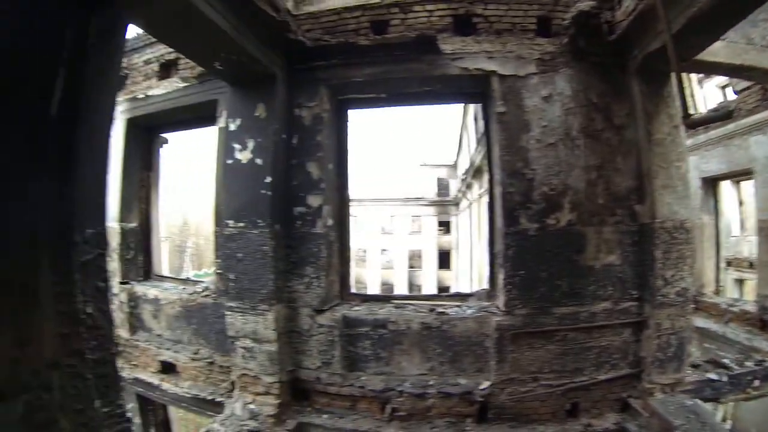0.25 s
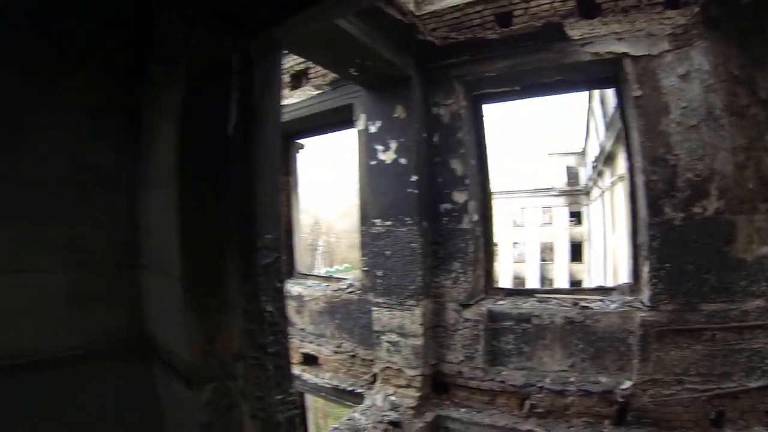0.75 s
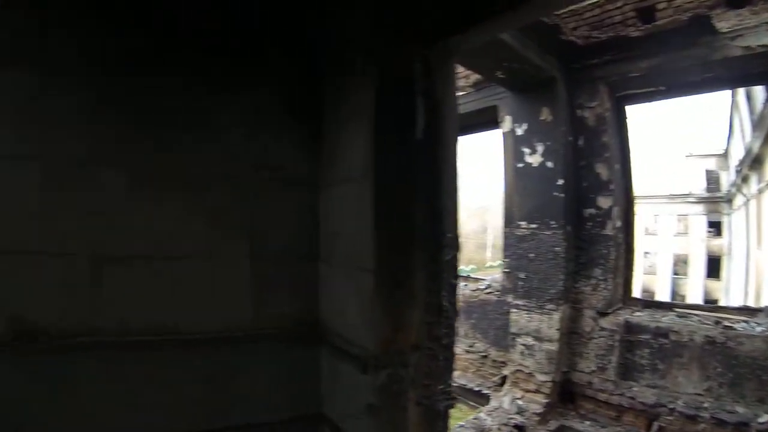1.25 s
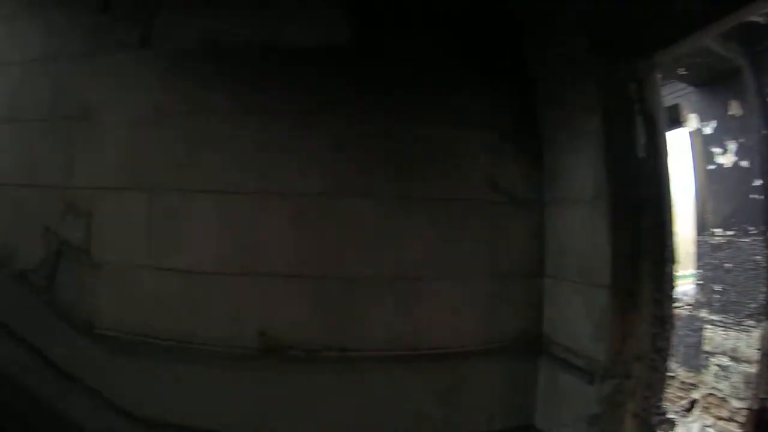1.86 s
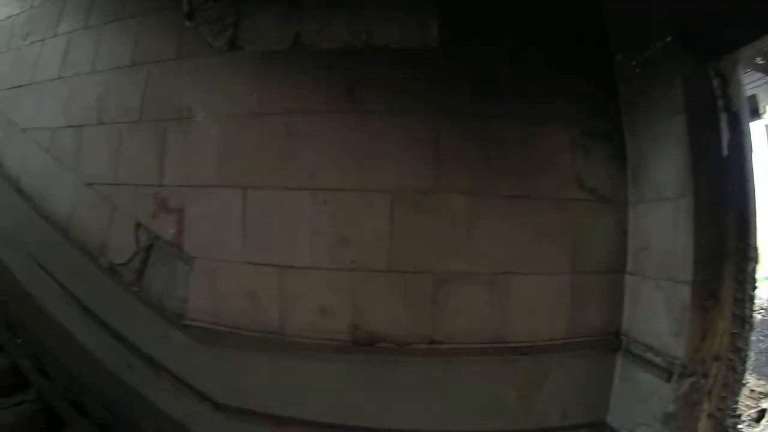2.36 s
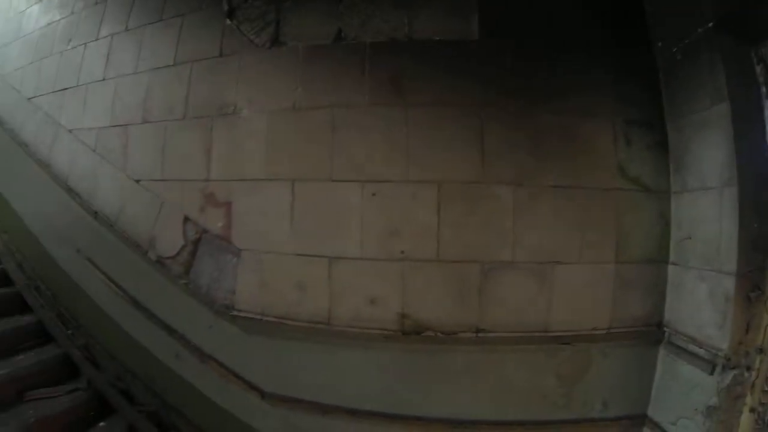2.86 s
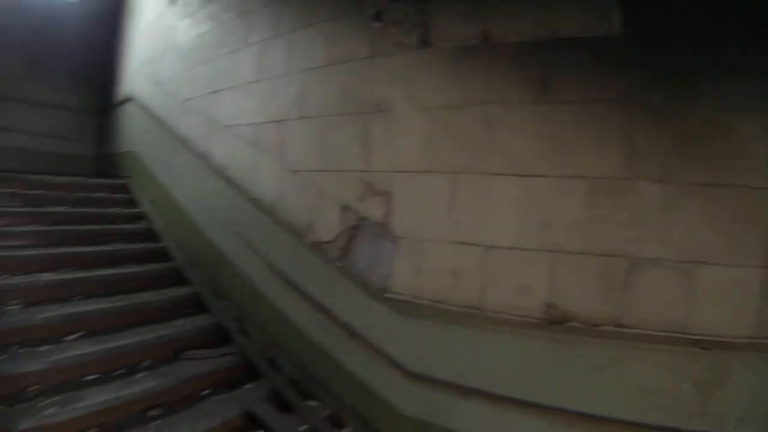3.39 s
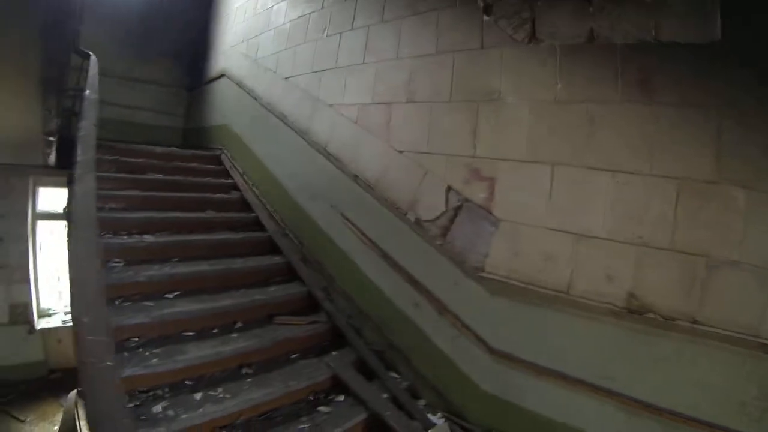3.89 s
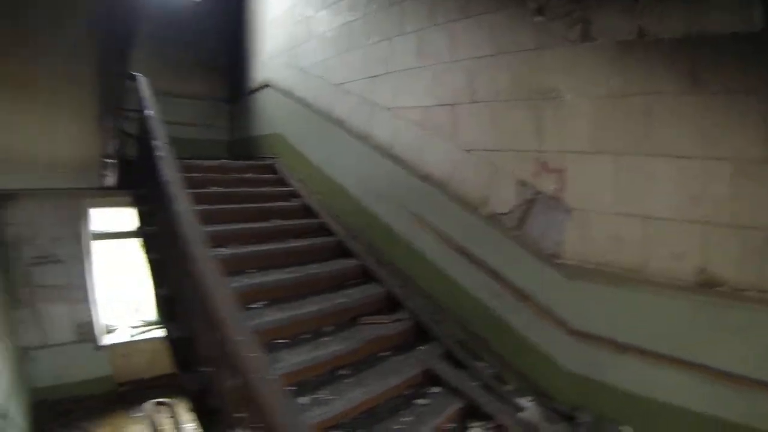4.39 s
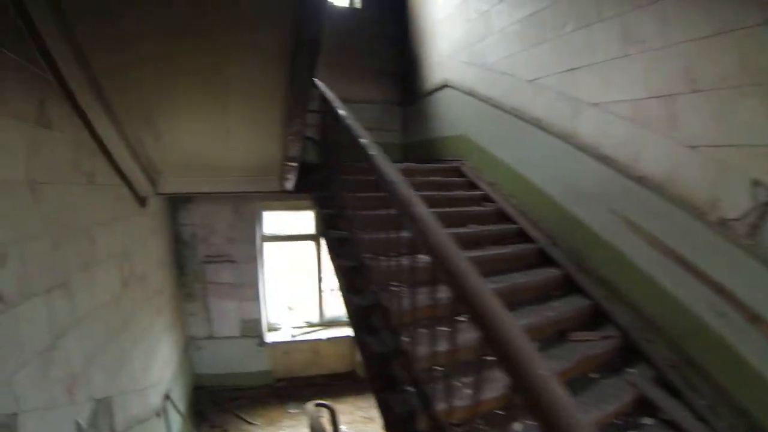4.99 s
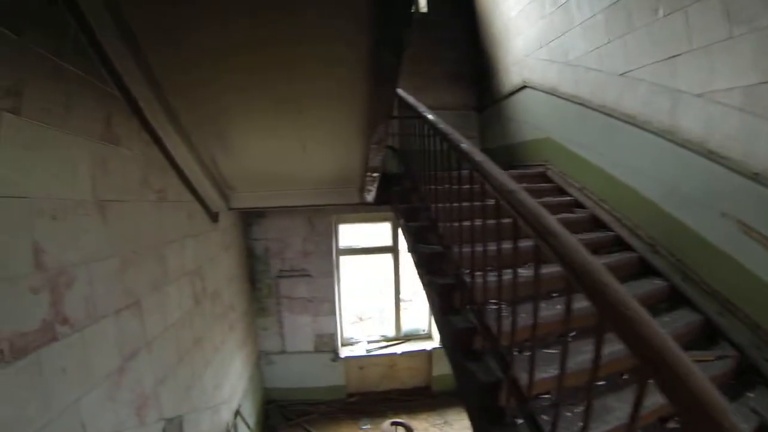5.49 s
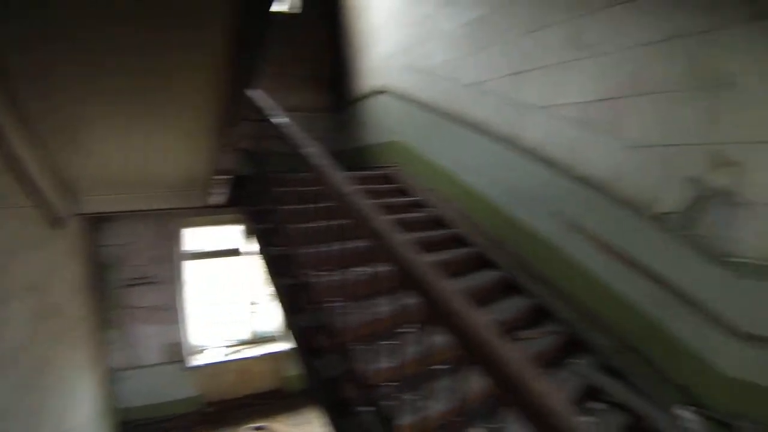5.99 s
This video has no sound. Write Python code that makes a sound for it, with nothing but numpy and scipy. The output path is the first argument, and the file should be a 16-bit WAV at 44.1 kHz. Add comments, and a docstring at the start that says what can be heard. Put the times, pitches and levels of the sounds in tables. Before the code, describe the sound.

Close, body-borne sound dominates: low fluttering rumble from an unsteady hand, dull thumps on plastic, short rattles and a faint palm rub. Knocks cluster early, thin out around two seconds, then return harder at three and almost four seconds with bright ticks. Quiet crunches underfoot follow near five, and two more thuds close it. Stairwell air is only a faint narrow hum through the sealed case, over hiss.

```python
"""Walk with a housed camera

Someone walks through a gutted building with a small camera sealed in a plastic housing on a hand grip.
Hand tremor is two bands of low noise with uneven levels; knocks, shell rattles and sharp ticks are sums
of decaying sines; the palm rubs the grip as low noise. Stairwell air and a few crunches of grit come
only through the housing's narrow resonance, as shaped noise and clicks. Preamplifier hiss lies beneath.
"""
import sys
import numpy as np
from scipy import signal
from scipy.fft import rfft, irfft, next_fast_len
from scipy.io import wavfile
from scipy.ndimage import uniform_filter1d, map_coordinates

SR = 44100
rng = np.random.default_rng(int(sys.argv[2]) if len(sys.argv) > 2 else 0)


def wav_out(sig):
    """Save sig, one row per channel (or a flat mono array), as 16-bit PCM at SR to the path in sys.argv[1]."""
    wavfile.write(sys.argv[1], SR, np.round(np.clip(np.atleast_2d(sig).T, -1, 1) * 32767).astype(np.int16))


N = 275625

# response of the housing window to airborne sound: f/Hz, relative level/dB
WINDOW_AIR = [(900, -26), (1230, -14.5), (1380, -2.5), (1600, 1), (1750, -10), (2050, -24.5), (3200, -23.5),
              (6000, -32)]


def hand():
    """Muscle tremor shakes the capsule: a slow sway and a faster quiver, each swelling unevenly."""
    # hand tension on the grip: t/s, slow shake level/dB, fast shake level/dB
    tension = [(0.0, -38, -35.5), (0.03, -31.5, -36), (0.14, -36.5, -51), (0.26, -31.5, -35.5),
               (0.4, -33, -48), (0.42, -35.5, -41), (0.62, -28, -38.5), (0.68, -34.5, -53),
               (0.73, -29, -43), (0.91, -36.5, -46), (0.92, -37.5, -52.5), (1.15, -37.5, -39.5),
               (1.2, -29, -44), (1.24, -37, -34), (1.3, -37, -44), (1.62, -33, -40), (1.67, -43.5, -49),
               (1.76, -29, -40), (1.83, -42, -47), (1.92, -33.5, -45), (2.28, -41, -47), (2.42, -34, -43.5),
               (2.63, -41.5, -43), (2.66, -39, -50), (2.94, -34.5, -44.5), (3.12, -35, -31.5),
               (3.19, -22, -36), (3.29, -44, -41.5), (3.34, -25, -47), (3.41, -31.5, -36),
               (3.6, -38.5, -47.5), (3.64, -28.5, -38), (3.71, -30, -42), (3.81, -43, -37.5),
               (3.9, -29.5, -46.5), (4.07, -30, -38), (4.11, -33.5, -52), (4.21, -24, -47),
               (4.35, -39, -44), (4.51, -27.5, -42.5), (4.59, -44, -41), (4.67, -31, -46.5),
               (4.7, -41.5, -43.5), (4.91, -33, -44.5), (5.41, -39.5, -44), (5.48, -50, -48),
               (5.55, -34.5, -57), (5.61, -39, -39), (5.66, -34, -58), (5.71, -46, -34), (5.76, -34, -45),
               (5.88, -45, -39.5), (5.94, -38.5, -48), (6.02, -39.5, -36.5), (6.18, -31.5, -48.5),
               (6.25, -38, -34.5)]
    # sway spectrum: f/Hz, relative density/dB
    slow_spectrum = [(8, -22), (14, -4), (25, 1.5), (38, -1), (48, -17.5), (60, -38.5)]
    # quiver spectrum: f/Hz, relative density/dB
    fast_spectrum = [(35, -50.5), (48, -1.5), (62, -8), (80, -13), (100, -19), (125, -30.5), (170, -34.5)]
    sway_rms_db, sway_knots_per_s = 0.6, 19
    quiver_rms_db, quiver_knots_per_s = 0.7, 22
    # muscles tense gradually
    slow_db, fast_db = uniform_filter1d(curves(tension), int(0.03 * SR))
    sway_swell = amp(sway_rms_db * flutter(sway_knots_per_s))
    sway = unit(sway_swell * noise(slow_spectrum, steady=1.0))
    quiver_swell = amp(quiver_rms_db * flutter(quiver_knots_per_s))
    quiver = unit(quiver_swell * noise(fast_spectrum, steady=0.65))
    return amp(slow_db) * sway + amp(fast_db) * quiver


def knocks():
    """Each knock rings housing body and grip, and throws the whole camera in the hand."""
    # knocks; the struck spot favours some modes: t/s, body gain/dB, grip gain/dB, favoured body f/Hz
    hits = [(0.047, -47, -55, 294), (0.207, -54.5, -83, 280), (0.365, -40, -42, 298),
            (0.383, -44.5, -56, 301), (0.408, -50, -55, 270), (0.484, -48.5, -55, 240),
            (0.544, -49.5, -51.5, 291), (0.577, -58, -68, 340), (0.632, -43.5, -56, 268),
            (0.672, -61, -63, 275), (0.734, -50.5, -72, 231), (0.823, -48, -52.5, 268),
            (1.127, -52.5, -64, 280), (1.292, -55, -54.5, 272), (1.599, -43, -51, 272),
            (1.757, -45, -52.5, 273), (2.545, -53.5, -56.5, 282), (2.706, -49.5, -55, 310),
            (2.979, -32, -37, 298), (2.994, -46, -47, 294), (3.228, -48, -69, 294), (3.549, -46, -54, 310),
            (3.87, -37.5, -50.5, 274), (3.948, -41.5, -57, 325), (4.484, -50, -65, 283),
            (4.671, -44, -58, 335), (4.759, -50, -71, 350), (5.128, -50, -75, 270), (5.708, -33, -52, 250),
            (6.215, -33.5, -45, 328)]
    # body modes: f/Hz, relative level/dB, t60/s
    body = [(197, 1, 0.055), (233.7, -5.5, 0.19), (275.7, 0.5, 0.13), (306.4, 0.5, 0.07),
            (343.4, -3, 0.064), (379, -1, 0.04), (430, -1, 0.04)]
    # grip mode: f/Hz, relative level/dB, t60/s
    grip = [(144, 0.023, 0.31)]
    # whole camera in the hand: f/Hz, level over body gain/dB, t60/s
    jolt = [(85.2, -1.5, 0.3)]
    blows = []
    for s, body_db, grip_db, body_hz in hits:
        blows.append((s, body_db, ring(body, 0.0038, body_hz, reach_oct=0.13)))
        blows.append((s, grip_db, ring(grip, 0.0035)))
        blows.append((s, body_db, ring(jolt, 0.0047)))
    return placed(blows)


def rattles():
    """The loose shell rattles around a knock, ringing its modes near a favoured pitch."""
    # rattles: t/s, gain/dB, favoured f/Hz, ring length/t60
    hits = [(0.205, -63, 756, 1.1), (0.378, -58, 560, 1.1), (0.399, -63, 570, 0.9), (0.416, -64, 540, 0.9),
            (0.634, -67, 600, 1.1), (1.599, -56.5, 614, 1.1), (1.605, -52, 730, 1.3),
            (1.619, -62, 685, 0.9), (2.547, -59, 720, 1.1), (2.709, -56.5, 804, 1.1),
            (2.982, -43.5, 985, 0.9), (2.989, -53, 760, 0.8), (3.23, -54, 930, 1.1), (3.246, -67, 820, 1.1),
            (3.257, -62, 930, 1.1), (3.554, -55.5, 920, 1.1), (3.872, -43, 1030, 0.6),
            (3.871, -45, 600, 0.6), (3.878, -38, 715, 0.8), (3.951, -47, 910, 0.7), (4.487, -54, 940, 1.1),
            (5.729, -62, 540, 0.9), (6.219, -52, 800, 0.9), (6.228, -62, 780, 0.9)]
    # shell modes: f/Hz, relative level/dB, nominal t60/s
    shell = [(579, 2, 0.055), (655, 13, 0.031), (723, 6, 0.035), (777, 5.5, 0.035), (864, 3.5, 0.047),
             (947, 5.5, 0.034), (1032, -7.5, 0.043)]
    return placed([(s, db, ring(shell, 0.0023, hz, 0.17, lasts)) for s, db, hz, lasts in hits])


def ticks():
    """Sharp ticks ring the housing window's modes near a favoured pitch."""
    # ticks: t/s, gain/dB, favoured f/Hz, spread/octaves, rise/ms, ring length/t60
    hits = [(1.6, -50, 1150, 0.3, 0.8, 1.2), (2.983, -32.5, 1590, 0.18, 1.4, 1.1),
            (3.809, -40.5, 1680, 0.15, 0.99, 1.5), (3.81, -34, 3050, 0.1, 0.8, 2.5),
            (3.8708, -23.5, 1550, 0.53, 1.02, 0.8), (3.947, -47, 1680, 0.21, 1, 1.8),
            (4.831, -60, 1580, 0.19, 1.1, 1.6), (4.843, -54, 1550, 0.2, 1.1, 1.6),
            (4.872, -67, 1500, 0.15, 0.8, 1.6), (4.883, -64, 1550, 0.3, 0.92, 1.2),
            (4.922, -63, 1570, 0.15, 1.2, 1.6), (5.044, -56, 1530, 0.14, 0.88, 1.6),
            (5.101, -56, 1600, 0.2, 0.75, 1.5), (5.112, -48.5, 1570, 0.13, 1.1, 2.2),
            (5.128, -52, 1600, 0.2, 1.1, 1.6), (5.712, -59, 1400, 0.2, 1.1, 1.6),
            (6.213, -51, 1900, 0.5, 0.8, 1.2), (6.219, -51.5, 1490, 0.14, 0.97, 2.2)]
    # window modes: f/Hz, relative level/dB, nominal t60/s
    window = [(1174, 5.5, 0.011), (1391, 5.5, 0.013), (1525, 2, 0.015), (1810, -0.5, 0.012),
              (2096, -3, 0.013), (2300, -8, 0.013), (2720, -13, 0.012), (3100, -30, 0.012)]
    return placed([(s, db, ring(window, rise_ms / 1000, hz, reach_oct, lasts))
                   for s, db, hz, reach_oct, rise_ms, lasts in hits])


def rubbing():
    """The palm rubs the grip in uneven slips: low noise with random swells."""
    # palm on the grip: t/s, level/dB
    palm_levels = [(0.0, -70), (0.3, -63), (0.45, -65), (0.53, -59), (0.62, -55.5), (0.7, -60),
                   (0.78, -68.5), (0.95, -68), (1.7, -65.5), (2.2, -67.5), (2.6, -64.5), (2.85, -63.5),
                   (3.12, -62), (3.24, -60), (3.4, -65.5), (3.6, -65), (4.2, -65), (4.7, -63), (5.0, -64.5),
                   (5.4, -70), (5.8, -65.5), (6.25, -68.5)]
    # rub spectrum: f/Hz, relative density/dB
    rub_spectrum = [(90, -32), (125, -12.5), (146, -0.5), (180, -3.5), (270, -6), (400, -13), (700, -18),
                    (1100, -26.5), (2000, -74)]
    (rub_db,) = curves(palm_levels)
    slips = amp(3.84 * wobble(22.055))
    return amp(rub_db) * unit(slips * noise(rub_spectrum))


def crunches():
    """Breaking grit under a sole: dense uneven clicks, heard through the window."""
    # crushes: t/s, decay time/s, gain/dB
    crushes = [(4.83, 0.045, -58), (4.878, 0.055, -61), (5.097, 0.034, -56), (6.21, 0.0099, -59)]
    brighter_db, dull_hz = 3.5, 4000  # rise per octave well above 1500 Hz; half gain of the treble cut
    strength = amp(3.3 * rng.exponential(size=N)) * rng.standard_normal(N)
    clicks = strength * (rng.random(N) < 0.08)  # 8 % of samples click

    def crisp(hz):
        """Grit is crisper than the air, but the housing dulls its treble."""
        return amp(brighter_db * np.log2(1 + hz / 1500)) / (1 + (hz / dull_hz) ** 5)

    grit = unit(filtered(coloured(np.clip(clicks, -8, 8), WINDOW_AIR), crisp))
    t, force = np.arange(N) / SR, np.zeros(N)
    for s, length_s, db in crushes:
        u = np.clip((t - s) / length_s, 0, None)
        force += amp(db) * (1 - np.exp(-u / 0.1)) * np.exp(-u ** 2)  # quick load, sole rolls off
    return force * grit


def outside_air():
    """Outside air hums in the housing window: unevenly swelling noise, weaker in the stairwell."""
    # outside air: t/s, level/dB
    air_levels = [(0.0, -64.5), (2.5, -64), (3.64, -69), (4.12, -65.5), (4.77, -68.5), (5.0, -66.5),
                  (5.59, -71.5), (6.25, -67)]
    (air_db,) = curves(air_levels)
    swell = amp(0.83 * wobble(13))
    return amp(air_db) * unit(swell * noise(WINDOW_AIR))


def preamp_hiss():
    """Steady coloured noise of the preamplifier."""
    # hiss spectrum: f/Hz, relative density/dB
    hiss_spectrum = [(100, -7), (400, 0), (1000, -5.5), (2000, -8.5), (4000, -13), (7500, -19.5),
                     (9600, -19), (11000, -25), (12300, -21), (13000, -36), (14800, -31.5)]
    hiss_db = -67.5
    return amp(hiss_db) * noise(hiss_spectrum)


def ring(modes, rise_s, favoured_hz=None, reach_oct=1, lasts=1):
    """One blow: decaying sines, 6 dB weaker at reach_oct octaves from the favoured pitch."""
    hz, db, t60 = np.transpose(modes)[:, :, None]
    t60 = t60 * lasts
    t = np.arange(int(t60.max() * SR)) / SR
    level_chance, phase_chance = rng.standard_normal((2, len(modes), 1))
    if favoured_hz:
        db = db - 6 * (np.log2(hz / favoured_hz) / reach_oct) ** 2
    decay = amp(db + 0.96 * level_chance - 60 * t / t60)
    tones = decay * np.sin(2 * np.pi * hz * t + 0.41 * phase_chance)
    return tones.sum(axis=0) * (1 - np.exp(-(t / rise_s) ** 2.6))  # a soft contact spreads the blow


def placed(blows):
    """Sum of (t/s, gain/dB, signal) blows on the time line."""
    out = np.zeros(N + SR)
    for s, db, part in blows:
        out[round(s * SR):][:len(part)] += amp(db) * part
    return out[:N]


def amp(db):
    """Decibels to gain."""
    return 10 ** (np.asarray(db) / 20)


def unit(x):
    """Scaled to rms 1."""
    return x / np.sqrt(np.mean(x ** 2) + 1e-20)


def curves(rows):
    """One value per sample for each column after the time."""
    s, *cols = np.transpose(rows)
    return [np.interp(np.arange(N) / SR, s, c) for c in cols]


def wobble(knots_per_s):
    """Smooth random curve through normally distributed knots."""
    knots = rng.standard_normal(int(N * knots_per_s / SR) + 4)
    return map_coordinates(knots, [np.arange(N) * knots_per_s / SR])


def flutter(knots_per_s):
    """Wobble of brief swells only, rms 1: the 0.22 s running mean is removed."""
    w = wobble(knots_per_s)
    return unit(w - uniform_filter1d(w, int(0.22 * SR)))


def filtered(x, response, ends="constant"):
    """x, padded past both ends with silence or its mirror image, times a response of frequency."""
    pad = SR // 4
    wide = np.pad(x, [(0, 0)] * (x.ndim - 1) + [(pad, pad)], ends)
    m = next_fast_len(N + 3 * pad)
    spectrum = rfft(wide, m) * response(np.fft.rfftfreq(m, 1 / SR))
    return irfft(spectrum, m)[..., pad:pad + N]


def coloured(x, spectrum):
    """x through (f/Hz, level/dB) points joined on a log axis, -120 dB outside them."""
    f, db = np.transpose(spectrum)

    def response(hz):
        """Gain at each frequency."""
        return amp(np.interp(np.log(hz + 1), np.log(f), db, left=-120, right=-120))

    return filtered(x, response)


def noise(spectrum, steady=0):
    """Coloured noise of rms 1; steady (0-1) evens out its own swells."""
    x = unit(coloured(rng.standard_normal(N), spectrum))
    if not steady:
        return x
    pad = SR // 4
    gentle = [(f, db / 8) for f, db in spectrum]
    for _ in range(3):
        envelope = np.abs(signal.hilbert(np.pad(x, pad, "reflect"))[pad:-pad])
        swell = envelope + 0.21  # floor limits the boost of lulls
        x = unit(coloured(x / swell ** steady, gentle))
    return x


def scene():
    """All that reaches the capsule."""
    housing = knocks() + rattles() + ticks()
    return (hand() + housing + rubbing() + crunches() + outside_air())[None]


def record(dry):
    """Preamplifier hiss is added; nothing is kept above the band limit."""
    top_hz = 14970
    return filtered(dry + preamp_hiss(), lambda hz: hz < top_hz, ends="reflect")


dry = scene()
out = record(dry)
wav_out(out)
```